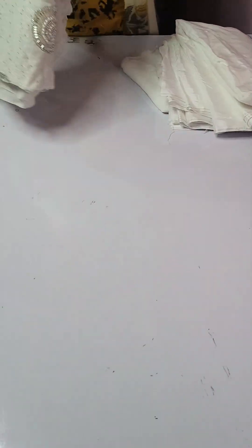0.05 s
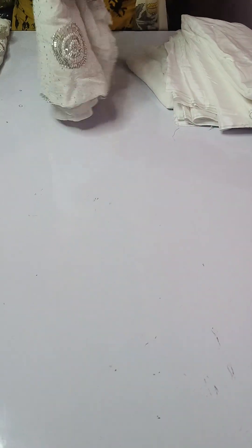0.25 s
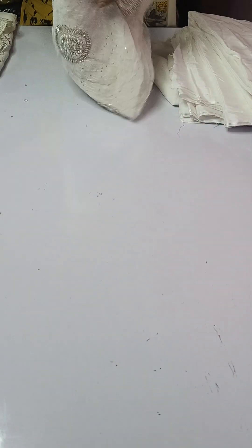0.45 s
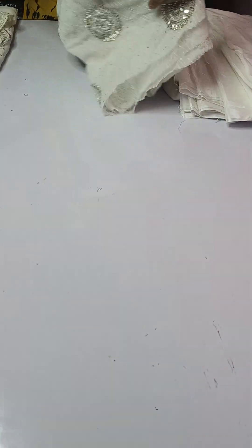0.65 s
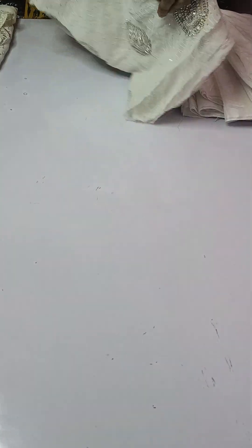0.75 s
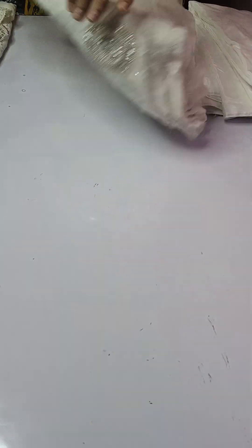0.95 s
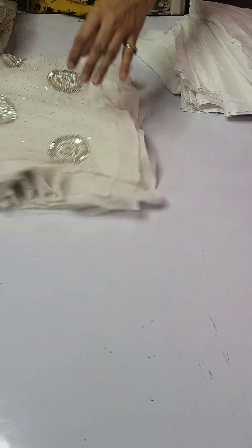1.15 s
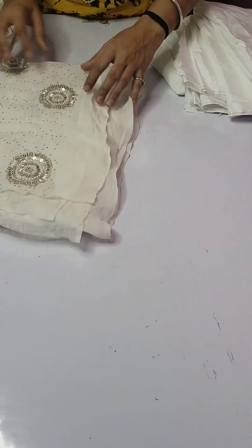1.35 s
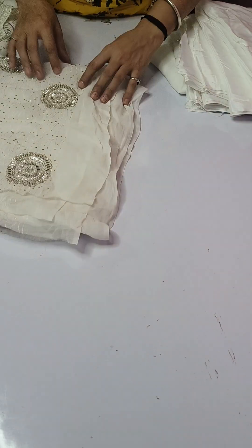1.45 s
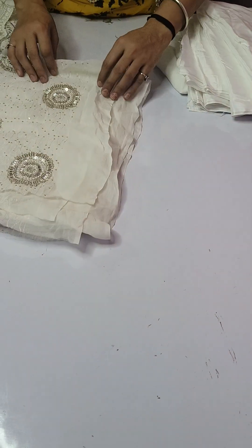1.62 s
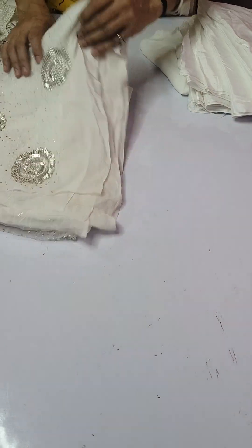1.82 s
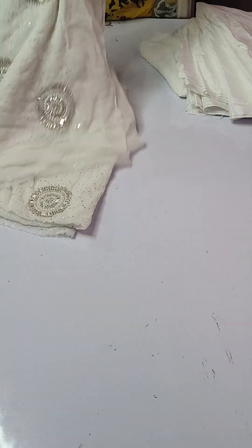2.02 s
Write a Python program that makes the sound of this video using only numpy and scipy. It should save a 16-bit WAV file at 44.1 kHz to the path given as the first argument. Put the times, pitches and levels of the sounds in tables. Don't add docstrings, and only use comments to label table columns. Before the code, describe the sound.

A single cloth flap onto a hard laminate table: a light hem tap, faint sequin rustle, then a crisp landing with bead clicks and a soft air thump, heard close in a small quiet room with low fan hum.

```python
import sys
import numpy as np
from scipy import signal
from scipy.fft import rfft, irfft, next_fast_len
from scipy.io import wavfile
from scipy.ndimage import uniform_filter1d

SR = 44100
rng = np.random.default_rng(int(sys.argv[2]) if len(sys.argv) > 2 else 0)


def magnitude_from_level(level_db):
    exponent = np.asarray(level_db, float) / 20
    return 10 ** exponent


def store_wav(level_fs):
    pcm = np.round(np.clip(np.atleast_2d(level_fs), -1, 1) * 32767)
    wavfile.write(sys.argv[1], SR, pcm.T.astype(np.int16))


N = 91639
T = np.arange(N) / SR
SIZE = next_fast_len(N + SR // 2)
F = np.arange(SIZE // 2 + 1) * SR / SIZE + 0.0011

# (frequency [Hz], level [dB])
HEM_COLOUR = [(500, -27), (1500, -10.5), (3000, 3.5), (5000, -0.5), (8000, 6), (12000, -2), (16000, -3)]


def unit(x):
    return x / np.sqrt(np.mean(np.abs(x) ** 2))


def shape(x, gain):
    return irfft(rfft(x, SIZE) * gain, SIZE)[..., :N]


def gains(table):
    hz, db = np.array(table).T
    return magnitude_from_level(np.interp(np.log(F), np.log(hz), db))


def colour(table):
    return unit(gains(table))


def curve(table):
    return magnitude_from_level(np.interp(T, *np.array(table).T))


def ring(hz, width_hz):
    return 1j * F * width_hz / (hz ** 2 - F ** 2 + 1j * F * width_hz)


def fade(at, db, t60, rise=.003):
    onset = np.clip((T - at) / rise, 0, 1)
    return onset * magnitude_from_level(db - 60 * np.maximum(T - at, 0) / t60)


def walk(rate):
    k = int(SR / rate)
    steps = np.repeat(rng.standard_normal(N // k + 1), k)
    return unit(uniform_filter1d(uniform_filter1d(steps, k), k)[:N])


def grains(rate, spread_db):
    chance, sign, size = rng.random((3, 2, N))
    hits = (chance < rate / SR) * np.sign(sign - .5)
    return unit(hits * magnitude_from_level(-spread_db * np.log(size + .002)))


def port_pair():
    alike = 1 / (1 + (F / 500) ** 2)
    mid, side = rng.standard_normal((2, N))
    common = shape(mid, np.sqrt(1 + alike))
    return common + np.array([[1], [-1]]) * shape(side, np.sqrt(1 - .95 * alike))


def shop():
    # (frequency [Hz], density [dB per Hz])
    air_floor = [(20, -88), (60, -91), (420, -90), (500, -99), (1750, -104), (3000, -113), (4000, -126),
                 (16000, -143)]
    # (frequency [Hz], width [Hz], level [dB])
    fan = [
        (69, 54, -65),
        (97, 24, -58),
        (184.3, 38.5, -65.5),
        (310, 140, -72),
        (340, 160, -73.5),
        (1123, 320, -71),
        (1500, 310, -80.5),
    ]
    # (time [s], level [dB])
    swell = [
        (0, -2),
        (.45, -2.5),
        (.6, 0),
        (1.0, -1.5),
        (1.4, 0),
        (2.08, 3),
    ]
    out = shape(port_pair(), gains(air_floor) * np.sqrt(SR / 2)) * magnitude_from_level(walk(3))
    for hz, width_hz, db in fan:
        out = out + shape(port_pair(), unit(ring(hz, width_hz) ** 2)) * magnitude_from_level(db + walk(4))
    high = shape(out, 1 / (1 + (700 / F) ** 4))
    return out + high * (curve(swell) - 1)


def room(x):
    t60_s, bend, gap_s, level_db = .16, 1.6, .003, -6
    s = T[:SR // 2]
    tail = rng.standard_normal((2, len(s))) * magnitude_from_level(-60 * (s / t60_s) ** bend) * (s > gap_s)
    return shape(x, rfft(tail / np.sqrt(np.sum(tail[0] ** 2)), SIZE)) * magnitude_from_level(level_db)


def thumps():
    # (time [s], level [dB], frequency [Hz], t60 [s])
    pushes = [
        (1.159, -38.5, 125, 0.11),
        (1.184, -34.5, 124.3, 0.21),
        (1.218, -35.5, 92.8, 0.18),
        (1.24, -46, 68.1, 0.38),
        (1.405, -41, 95, 0.12),
    ]
    puff_s, puff_width_s, puff_db, puff_hz = 1.205, .035, -47, 278
    swell = magnitude_from_level(puff_db) / (1 + ((T - puff_s) / puff_width_s) ** 2) * (T > 1.13)
    out = shape(rng.standard_normal(N) * swell, unit(ring(puff_hz, puff_hz) ** 2))
    for at, db, hz, t60 in pushes:
        s = np.maximum(T - at, 0)
        soft_rise = 1 - np.exp(-s / .006)
        out = out + magnitude_from_level(db - 60 * s / t60) * soft_rise * np.sin(2 * np.pi * hz * s) * 2
    return out


def rustle():
    # (time [s], level [dB])
    slide = [(0, -101), (.45, -89), (.69, -88), (.72, -75), (.75, -77), (.82, -77), (.845, -81),
             (.862, -74), (.885, -80), (.905, -71), (.95, -72), (.975, -92), (1.02, -88.5), (1.8, -100),
             (1.925, -84), (1.948, -72), (2.08, -69)]
    # (start [s], length [s], level [dB], pitch [Hz])
    sequins = [(.481, .01, -71, 4750), (.329, .01, -78, 6900), (.705, .045, -72, 11600),
               (.73, .022, -68, 7950), (.757, .04, -72, 7900), (.785, .06, -81, 4400),
               (.785, .04, -77, 3050), (.893, .03, -76, 4800), (.76, .045, -78, 6650),
               (.9, .045, -73, 6200), (.905, .045, -73, 7900), (.905, .03, -76, 2950),
               (.925, .035, -76, 4750), (.705, .05, -76, 13000), (.72, .02, -79, 5400),
               (.628, .03, -70, 3080), (1.98, .04, -81, 3350), (2.05, .025, -75, 3150)]
    out = shape(grains(15000, 1.5) * curve(slide) * magnitude_from_level(2.0 * walk(80)), colour(HEM_COLOUR))
    for at, length, db, hz in sequins:
        swell = np.sin(np.pi * np.clip((T - at) / length, 0, 1) ** .7) ** .5
        band = unit(ring(hz, hz * .07) ** 2)
        out = out + shape(grains(5000, 2.5) * swell * magnitude_from_level(db), band)
    return out


def knocks():
    # (time [s], level [dB], frequency [Hz], t60 [s])
    hits = [(.547, -49, 3080, .04), (.554, -47, 2930, .05), (.548, -60, 1300, .03), (.573, -62, 3050, .05),
            (.589, -62, 3050, .04), (.547, -58, 8000, .02), (.552, -55, 6700, .03), (.548, -59, 5400, .02),
            (.553, -60, 3760, .06), (.551, -61, 2200, .07), (.593, -59, 8000, .015),
            (.4815, -65, 2600, .012), (1.084, -55, 3320, .03), (1.089, -47, 3060, .03),
            (1.093, -41, 3040, .045), (1.098, -56, 1534, .05), (1.092, -53, 5300, .025),
            (1.088, -54, 4100, .05), (1.134, -39, 2250, .05), (1.137, -35, 905, .09),
            (1.137, -40, 2980, .05), (1.141, -43, 4600, .04), (1.149, -33, 2950, .05),
            (1.164, -35, 3050, .05), (1.173, -33, 3060, .04), (1.175, -35, 893, .1),
            (1.183, -37, 1480, .06), (1.186, -40, 920, .08), (1.203, -43, 880, .14),
            (1.216, -38, 1500, .06), (1.238, -43, 1200, .08), (1.249, -39, 2880, .04),
            (1.264, -42, 2900, .05), (1.296, -46, 2950, .05), (1.325, -49, 3050, .08),
            (1.335, -59, 880, .15)]
    rise_s, rough_db = .0015, 1.5
    skew = 1.2 * np.array([[.5], [-.5]])
    rings = 0
    for at, db, hz, t60 in hits:
        tone = np.sqrt(2) * np.sin(2 * np.pi * hz * (T - at) + skew)
        rings = rings + fade(at, db, t60, rise_s) * tone
    return rings * magnitude_from_level(rough_db * walk(400))


def taps():
    # (time [s], level [dB], t60 [s])
    hem_taps = [
        (.33, -72, .03),
        (.481, -66, .02),
        (.546, -49, .04),
        (.548, -54, .3),
        (1.081, -52, .1),
        (1.087, -45, .15),
        (1.108, -52, .3),
    ]
    # (time [s], level [dB])
    beads = [(.125, -67), (.506, -67), (.861, -63), (1.1435, -26), (1.149, -27), (1.199, -28), (1.215, -27),
             (1.227, -30), (1.318, -39), (1.33, -44), (2.018, -59)]
    bright = sum(fade(at, db, t60) for at, db, t60 in hem_taps)
    ticks = sum(fade(at, db, .025, rise=.001) for at, db in beads)
    treble = unit(1 / (1 + (11500 / F) ** 6))
    return shape(grains(20000, 1.0) * bright, colour(HEM_COLOUR)) + shape(grains(20000, 1.0) * ticks, treble)


def board():
    # (frequency [Hz], level [dB], t60 [s])
    modes = [
        (891, -3, .11),
        (922, -5, .09),
        (1060, -5, .08),
        (1484, -5, .06),
        (1910, -9, .05),
        (2950, -1, .03),
    ]
    return unit(sum(magnitude_from_level(db) * ring(hz, 2.2 / t60) * np.sqrt(t60) for hz, db, t60 in modes))


def landing():
    # (time [s], contact level [dB])
    contacts = [
        (1.122, -52),
        (1.139, -28.5),
        (1.148, -28),
        (1.156, -37.5),
        (1.19, -27),
        (1.222, -34),
        (1.245, -39),
        (1.426, -62),
        (1.5, -80),
    ]
    # (frequency [Hz], level [dB])
    cloth = [(300, -16), (780, 1), (950, 8.5), (3000, 10), (5000, 5), (8000, 6.5), (12000, 2.5),
             (16000, -1.5)]
    start_s, end_s = contacts[0][0], contacts[-1][0]
    inside = (T > start_s) * np.clip((end_s + .03 - T) / .03, 0, 1)
    force = grains(7000, 3.0) * curve(contacts) * inside * magnitude_from_level(1.5 * walk(100))
    weight_hz, weight_s, weight_db = 2080, 1.185, -13
    heavy = force * magnitude_from_level(weight_db * np.clip((weight_s - T) / .02, 0, 1))
    low = 1 / (1 + (F / weight_hz) ** 4)
    fabric = shape(force, colour(cloth) * (1 - low)) + shape(heavy, colour(cloth) * low)
    return fabric + shape(force * magnitude_from_level(-10.5), board())


def scene():
    near = landing() + taps() + knocks() + rustle()
    pan_db = -3.5 / (1 + ((F - 3000) / 2000) ** 2)
    ports = magnitude_from_level(np.array([pan_db, -pan_db]) / 2)
    return shape(near + room(near), ports) + thumps() + shop()


def band_limit(x):
    return signal.sosfilt(signal.butter(12, 16450, fs=SR, output="sos"), x)


def record(dry):
    notch_db = -17 / (1 + ((F - 9700) / 500) ** 2)
    peak_db = 6 / (1 + ((F - 12800) / 450) ** 2)
    hiss = shape(rng.standard_normal(dry.shape), magnitude_from_level(-90.5 + 7 * (F > 12200)))
    top = np.clip((16120 - F) / 250, 0, 1)
    return band_limit(shape(dry + hiss, magnitude_from_level(notch_db + peak_db) * top))


dry = scene()
out = record(dry)
store_wav(out)
```